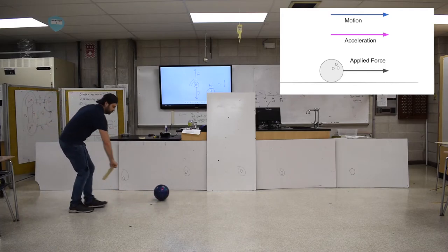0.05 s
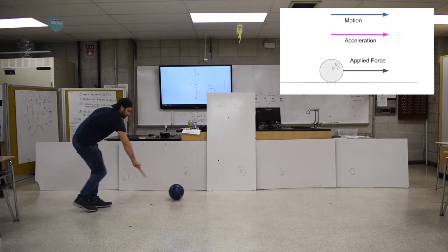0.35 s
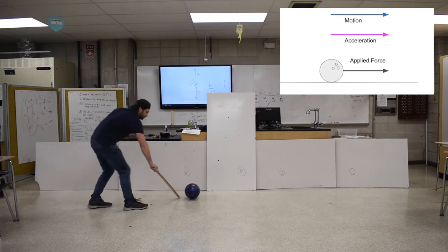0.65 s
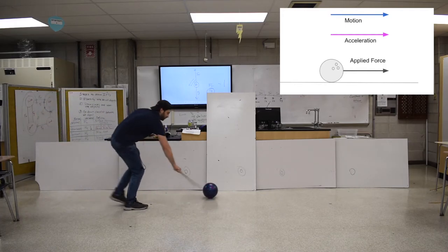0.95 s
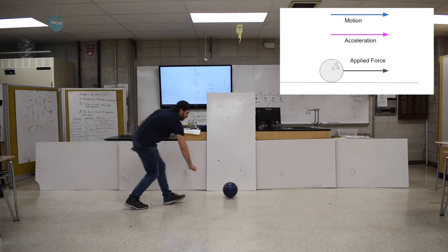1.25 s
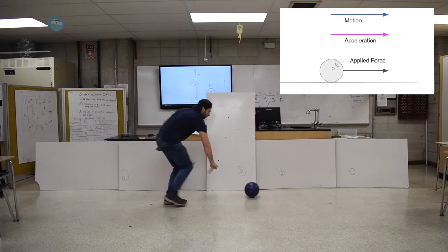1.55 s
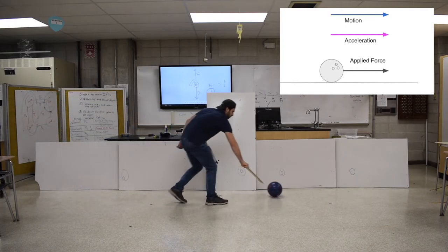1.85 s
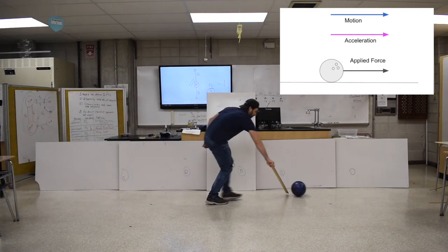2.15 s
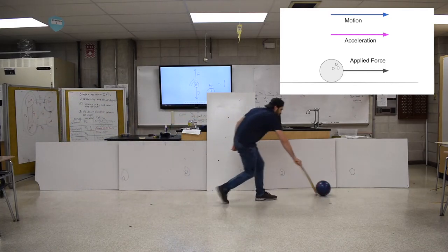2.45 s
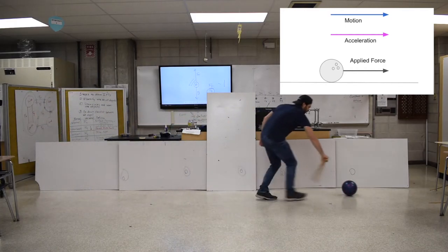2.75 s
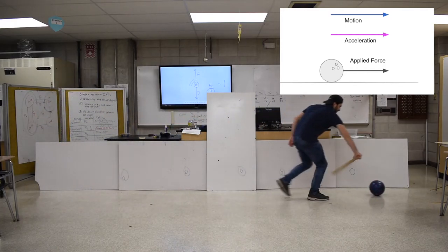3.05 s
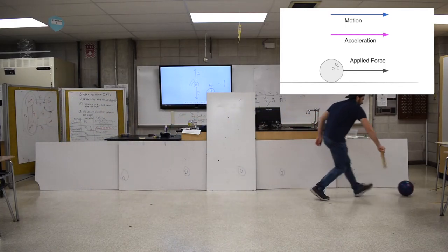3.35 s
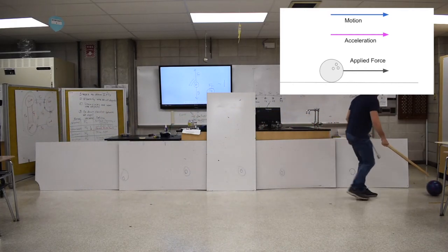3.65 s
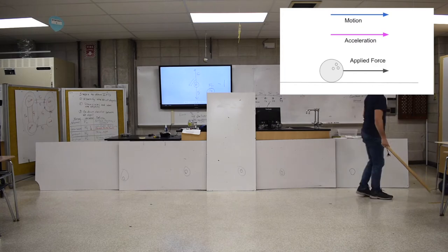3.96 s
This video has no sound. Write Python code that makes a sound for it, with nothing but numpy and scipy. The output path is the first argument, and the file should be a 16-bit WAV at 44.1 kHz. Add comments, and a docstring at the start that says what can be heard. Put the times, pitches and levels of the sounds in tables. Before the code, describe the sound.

A stick knocks a heavy rolling ball nine times before it crashes into metal furniture.

```python
"""Sharp wooden knocks ring through a live classroom, over a low ventilation hum and a faint shoe scuff.
A stick hits a bowling ball nine times, driving it across the hard floor. The ball rumbles as it gathers
speed, thuds over its finger holes, then crashes into metal furniture, which clanks and booms.
Each knock overloads a limiter, which ducks the room and lets it swell back."""
import sys
import numpy as np
from scipy import signal
from scipy.fft import rfft, irfft
from scipy.io import wavfile
from scipy.ndimage import minimum_filter1d

SR = 44100
rng = np.random.default_rng(int(sys.argv[2]) if len(sys.argv) > 2 else 0)


def store_pcm(level_fs):
    """Save levels as 16-bit WAV."""
    pcm = np.round(np.clip(level_fs, -1, 1) * 32767).astype(np.int16)
    wavfile.write(sys.argv[1], SR, np.atleast_2d(pcm).T)


N = 176400
SIZE = 32768  # samples in a room response
HZ = np.fft.rfftfreq(SIZE, 1 / SR)


def amp(db):
    """Decibels to gain."""
    return 10 ** (np.asarray(db) / 20)


def unit(x):
    """Scales to an energy of one."""
    return x / np.sqrt(np.sum(x ** 2) + 1e-20)


def read(points, hz):
    """Reads a table on a log-frequency axis."""
    f, value = np.transpose(points)
    return np.interp(np.log(hz + 1), np.log(f), value)


def add(mix, s, sound):
    """Mixes a sound in at s seconds."""
    part = mix[round(s * SR):][:len(sound)]
    part += sound[:len(part)]


def equalise(x, spectrum):
    """Applies an EQ curve to a full-length track."""
    return irfft(rfft(x) * amp(read(spectrum, np.fft.rfftfreq(N, 1 / SR))), N)


def noise(spectrum):
    """Steady coloured noise of rms one."""
    return np.sqrt(N) * unit(equalise(rng.standard_normal(N), spectrum))


def bell(hz, width_hz):
    """A resonant peak of height one."""
    return 1 / (1 + (2 * (HZ - hz) / width_hz) ** 2)


def body(spectrum, modes, ring_db=0):
    """Gain per frequency of a struck object: a broad spectrum with resonant peaks."""
    peaks = sum((amp(db + ring_db) * bell(hz, width)) ** 2 for hz, width, db in modes)
    broad = amp(read(spectrum, HZ))
    return np.sqrt((broad ** 2 + peaks) / np.mean(broad ** 2))


def strike(gain, path):
    """A minimum-phase click of the given colour, sent along a path through the room."""
    log_gain = np.log(np.maximum(np.r_[gain, gain[-2:0:-1]], 1e-5))
    click = np.fft.ifft(np.exp(np.conj(signal.hilbert(log_gain)))).real
    return signal.fftconvolve(click[:SIZE // 2], path)


# Classroom reverb time: freq_hz, t60_s
ROOM_DECAY = [(80, 0.42), (250, 0.91), (600, 0.47), (1500, 0.5), (3000, 0.52), (5500, .53), (9000, 0.43),
              (15000, 0.53)]
CHATTER_S, DIRECT_S, EARLY_S, BUILD_S = 0.0017, 0.0011, 0.0058, 0.011
CLUMP_DB, CLUMP_S, CLUMP_FADE_S = 2.2, 0.014, 0.2
WALL_S, WALL_SPREAD_S, WALL_DB = 0.076, 0.019, 3  # slap off the far walls


def room(direct_db, early_db):
    """Path from one spot: a short direct burst, sparse near reflections, then a clumpy tail."""
    t = np.arange(SIZE) / SR
    burst, near, far, lumps = rng.standard_normal((4, SIZE))
    chatter = irfft(np.exp(1j * np.angle(rfft(burst * np.exp(-t / CHATTER_S)))))  # flat spectrum
    direct = chatter * np.exp(-t / DIRECT_S)
    early = near * (rng.random(SIZE) < .05) * t * np.exp(-t / EARLY_S)
    hz, age, bands = signal.stft(far, SR, nperseg=256)
    decay = amp(-60 * age / read(ROOM_DECAY, hz)[:, None])
    wash = signal.istft(bands * decay, SR, nperseg=256)[1][:SIZE]
    clumps = amp(CLUMP_DB * np.interp(t / CLUMP_S, np.arange(SIZE), lumps) * np.exp(-t / CLUMP_FADE_S))
    walls = amp(WALL_DB * np.exp(-((t - WALL_S) / WALL_SPREAD_S) ** 2))
    tail = wash * clumps * walls * (1 - np.exp(-t / BUILD_S))
    return unit(tail) + amp(direct_db) * unit(direct) + amp(early_db) * unit(early)


# Dark room tone: freq_hz, gain_db
VENT_EQ = [(20, 3.5), (50, 3), (80, -2), (125, 4), (190, -9.5), (350, -4.5), (600, -15), (1200, -25),
           (3000, -37), (6000, -40.5), (10000, -44.5), (16000, -42)]


def ventilation():
    """Moving air lays a steady, low bed under the scene."""
    return amp(-33) * noise(VENT_EQ)


# Soles on the floor: start_s, length_s, level_db, centre_hz
SCUFFS = [(0.064, 0.16, -51, 5400), (3.437, 0.019, -23, 952)]
SCUFF_OCTAVES = 0.98  # centre to 6 dB down


def shoes():
    """Shoes scuff the floor in short swells of rubbing noise."""
    out = np.zeros(N)
    for s, length, db, hz in SCUFFS:
        band_db = np.maximum(-6 * (np.log2(HZ[1:] / hz) / SCUFF_OCTAVES) ** 2, -50)
        swell = np.hanning(int(length * SR))
        rub = noise(np.c_[HZ[1:], band_db])[:len(swell)] * swell
        add(out, s, amp(db) * signal.fftconvolve(rub, unit(room(direct_db=5.1, early_db=-11))))
    return out


# Bass-heavy rumble: freq_hz, gain_db
ROLL_EQ = [(20, -29), (50, 9.5), (90, 4), (150, 5.5), (300, -18.5), (600, -5), (1500, -83), (16000, -82)]
# Fader ride on the rumble: time_s, level_db
ROLL_FADER = [(.2, -49), (.7, -45.5), (1.7, -35), (2.7, -41.5), (3.9, -35)]


def rolling_ball():
    """The ball rumbles on the hard floor, louder with speed."""
    level_db = np.interp(np.arange(N) / SR, *np.transpose(ROLL_FADER))
    return noise(ROLL_EQ) * amp(level_db)


# Finger holes meeting the floor: start_s, level_db
THUDS = [(1.859, -3), (1.905, -1.5), (2.246, -1), (2.449, 2.5), (2.476, -1), (2.487, 4), (2.997, 6.5),
         (3.037, 11.5), (3.075, -2), (3.496, 3.5), (3.546, 13.5), (3.581, 7)]
# Dull body of a thud: freq_hz, gain_db
THUD_EQ = [(30, -8), (100, -20), (165, -1), (230, -3), (340, -9), (500, -16), (900, -46), (3000, -73),
           (16000, -66)]
THUD_MODES = [(174, 42, -5.4), (277, 2.7, -1.4)]  # pitch_hz, width_hz, gain_db
THUD_ATTACK_S = 0.0021


def finger_holes():
    """The turning ball thuds as its holes pass over the floor."""
    out = np.zeros(N)
    for s, db in THUDS:
        thud = strike(body(THUD_EQ, THUD_MODES), room(direct_db=2, early_db=-4))
        attack = 1 - np.exp(-np.arange(len(thud)) / SR / THUD_ATTACK_S)
        add(out, s, amp(db) * thud * attack)
    return out


# Jolts and rattles of the crash: start_s, clank_db, ring_db, boom_db
CRASHES = [(3.7735, -17, 15, -12), (3.7829, 32.5, 5.5, 25.5), (3.802, 3, -7, 32), (3.829, 7, -4, 24.5),
           (3.876, 19, -9, 26), (3.889, 27.5, -6, 20.5), (3.946, 15.5, -10, 24), (3.976, 18.5, -9, 23)]
# Hard clank of the frame: freq_hz, gain_db
CLANK_EQ = [(100, -17), (500, -7.5), (900, -1.5), (1600, -6.5), (2400, -5.5), (4000, -14.5), (8000, -19.5),
            (12000, -33), (16000, -45)]
# Metallic ring of the frame: pitch_hz, width_hz, gain_db
FRAME_MODES = [(880, 44, -1), (1070, 117, 4), (1310, 35, 5), (2080, 170, 3), (2640, 40, -1),
               (3120, 23, -1.5), (3380, 88, -10.5), (5500, 520, -24), (7800, 450, -23.5)]
# Low weight of the panel: freq_hz, gain_db
BOOM_EQ = [(20, -3), (45, -4), (90, -1), (200, -7.5), (400, -5), (700, -14.5), (2000, -20), (16000, -38)]
# Hollow ring of the panel: pitch_hz, width_hz, gain_db
PANEL_MODES = [(86.3, 11, 3.5), (264, 8.9, 11), (337, 5.9, -6), (401, 16, -5)]


def furniture():
    """The ball hits the furniture; every jolt clanks the metal frame and booms its panel."""
    out = np.zeros(N)
    for s, clank_db, ring_db, boom_db in CRASHES:
        clank = strike(body(CLANK_EQ, FRAME_MODES, ring_db), room(direct_db=-1, early_db=-1))
        boom = strike(body(BOOM_EQ, PANEL_MODES), room(direct_db=-10, early_db=-7))
        add(out, s, amp(clank_db) * clank + amp(boom_db) * boom)
    return out


# Stick hits: start_s, clack_hz, clack_db, trim_db, crack_db, ring_db, then colour_db per colour band
KNOCKS = [(.2108, 2580, 2.8, 0, 0.67, -1.5, 0.5, 1, 0.5, 1.5, -1, -5),
          (.6328, 2990, 4, 5.1, 1, -5, -2.5, 2, -0.5, 5.5, -2, -8.5),
          (1.0063, 5160, 4, 1.4, 1.2, 2, 0.5, -2.5, -1, 0, 2.5, 2),
          (1.3889, 4320, 2.6, 0.087, 1.2, 0, 1.5, 1, -2.5, 6, 4.5, 2),
          (1.7800, 3620, 5.1, 0, 1.3, -4, -0.5, 2.5, 4, 1, 3.5, -6),
          (2.131, 3910, 5.2, 1.7, 2.7, -27, 3.5, 4, 3.5, 3, 4, -7),
          (2.4947, 2550, 1.5, 2, 0.67, -7.5, 4, 2.5, 0.5, 8.5, 9, -3.5),
          (2.8438, 5560, 4, 0, 0.72, -4.5, 3.5, 2, 0, 8, 11, 1),
          (3.1777, 2400, 4.2, 0, 1.7, -20, 4.5, 6.5, 7, 8, 8, -2)]
# Colour bands of a hit: centre_hz
COLOUR_HZ = [1150, 3300, 4400, 5900, 8200, 12000]
# Woody bite of a hit: freq_hz, gain_db
KNOCK_EQ = [(60, -36), (250, -15.5), (550, -6), (1100, 1), (2000, 2.5), (4400, -1.5), (6000, -9.5),
            (8000, -16.5), (10000, -22.5), (12000, -29.5), (16000, -38.5)]
# Bending modes of the stick: pitch_hz, width_hz, gain_db
STICK_MODES = [(1249, 90, 1), (1850, 100, 11), (2590, 150, 8.5), (3390, 150, 6), (4280, 260, 3.5),
               (5070, 190, 3), (5850, 200, -3)]
# Light second touches: start_s, level_db, direct_db
TAPS = [(2.168, 11, 13), (3.2097, 12, 16)]
# Thin tick of a touch: freq_hz, gain_db
TAP_EQ = [(100, -25), (900, -10), (2200, -8), (3600, 4), (4600, 0), (6000, -10), (10000, -24), (16000, -42)]
KNOCK_DB, PIVOT_HZ, CLACK_WIDTH_HZ = 28.5, 2160, 280


def stick():
    """Each blow lands on another part of the stick, so its ring and colour differ."""
    out = np.zeros(N)
    for s, clack_hz, clack_db, trim_db, crack_db, ring_db, *colour in KNOCKS:
        colour_eq = sorted([(PIVOT_HZ, 0), *zip(COLOUR_HZ, colour)])
        tint = amp(read(colour_eq, HZ) + clack_db * bell(clack_hz, CLACK_WIDTH_HZ))
        knock = strike(body(KNOCK_EQ, STICK_MODES, ring_db) * tint, room(crack_db, early_db=0))
        add(out, s, amp(KNOCK_DB + trim_db) * knock)
    for s, db, direct_db in TAPS:
        add(out, s, amp(db) * strike(body(TAP_EQ, []), room(direct_db, early_db=-14)))
    return out


def scene():
    """Stick, ball, shoes and furniture over the ventilation, in mono."""
    return (stick() + rolling_ball() + finger_holes() + shoes() + furniture() + ventilation())[None]


def smooth(x, seconds):
    """One-pole lag."""
    r = np.exp(-1 / (seconds * SR))
    return signal.lfilter([1 - r], [1, -r], x)


LIMIT_DB, SENSE_S, ATTACK_S, HOLD_S, RELEASE_DB_PER_S = -8.5, 0.01, 0.0029, 0.018, 144.5


def limiter(dry):
    """Reacts too late for the front of each crack, then ducks, holds and recovers."""
    level_db = 10 * np.log10(smooth(dry[0] ** 2, SENSE_S) + 1e-12)
    over_db = np.maximum(level_db - LIMIT_DB, 0)
    half = int(HOLD_S * SR / 2)
    held_db = -minimum_filter1d(-over_db, 2 * half + 1, origin=half, mode="nearest")
    fall = np.arange(N) / SR * RELEASE_DB_PER_S
    duck_db = smooth(np.maximum.accumulate(held_db + fall) - fall, ATTACK_S)
    return dry * amp(-duck_db)


# Gentle top-end roll-off: freq_hz, gain_db
TREBLE_EQ = [(9000, 0), (11000, -1.5), (13000, -2), (16000, -5)]
CEILING, KNEE, CUTOFF_HZ = 0.93, 2.6, 15900


def record(dry):
    """Master chain: limiter, soft clip, treble roll-off and a steep low-pass."""
    ducked = limiter(dry)
    clipped = ducked / (1 + abs(ducked / CEILING) ** KNEE) ** (1 / KNEE)
    lowpass = signal.firwin(255, CUTOFF_HZ, window=("kaiser", 8), fs=SR)
    return signal.oaconvolve(equalise(clipped, TREBLE_EQ), lowpass[None], "same")


dry = scene()
out = record(dry)
store_pcm(out)
```